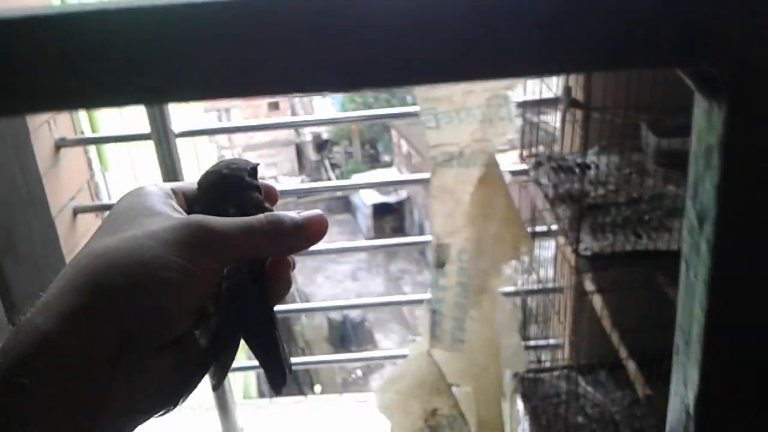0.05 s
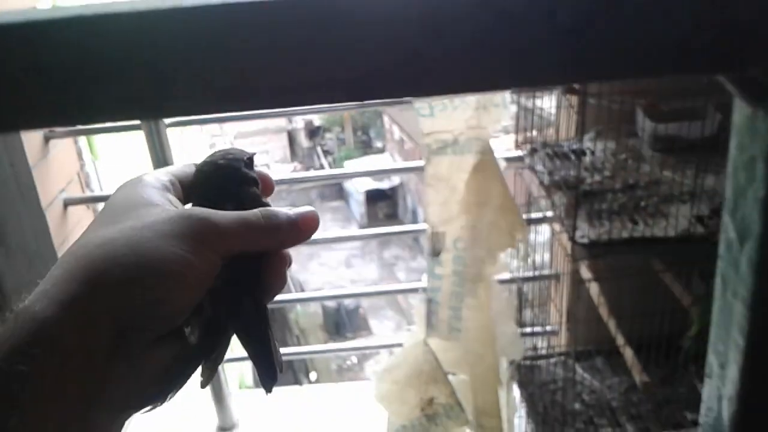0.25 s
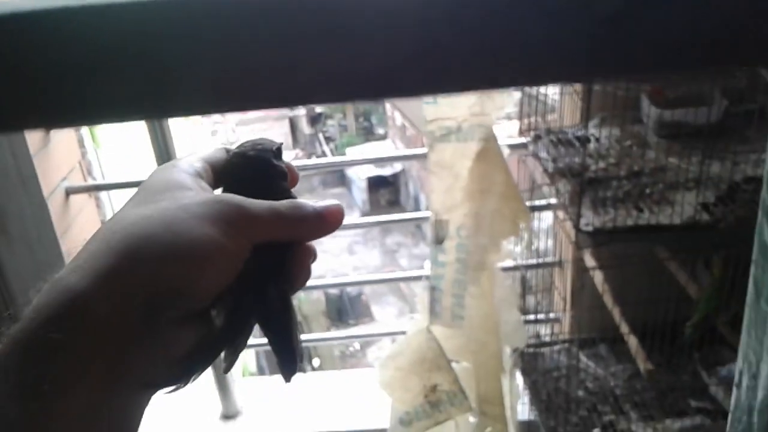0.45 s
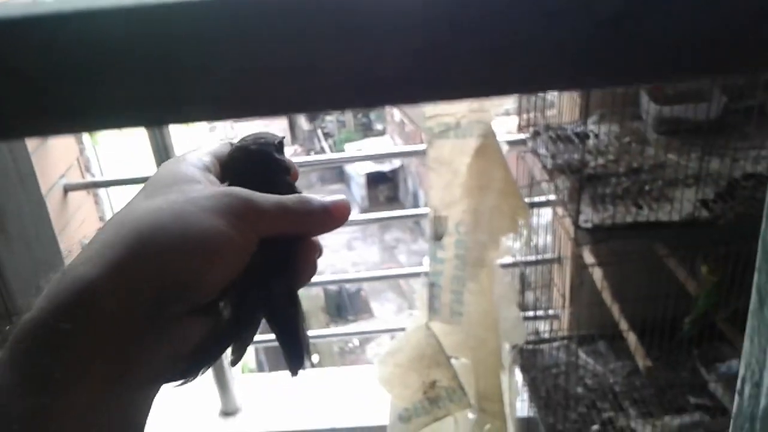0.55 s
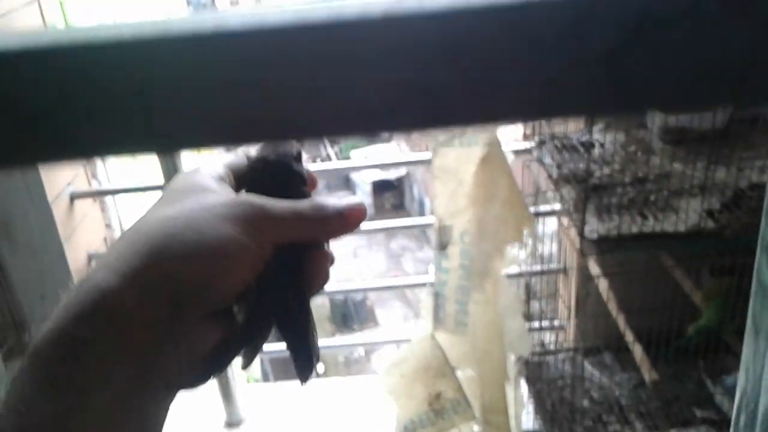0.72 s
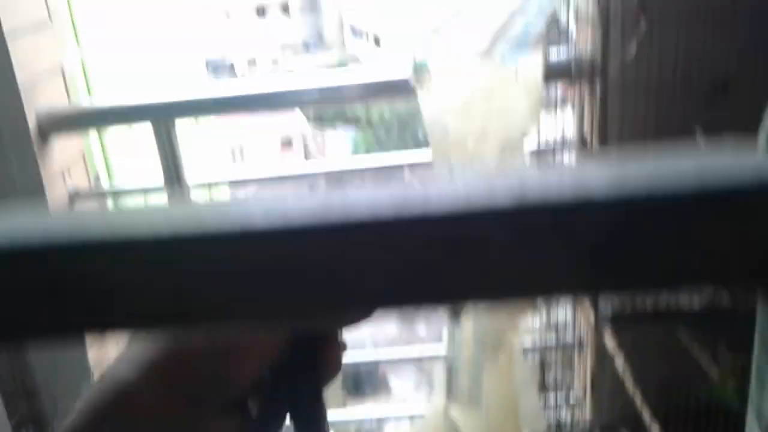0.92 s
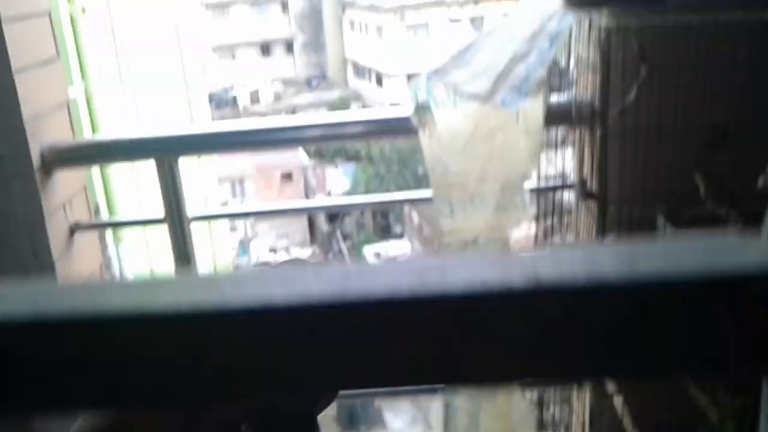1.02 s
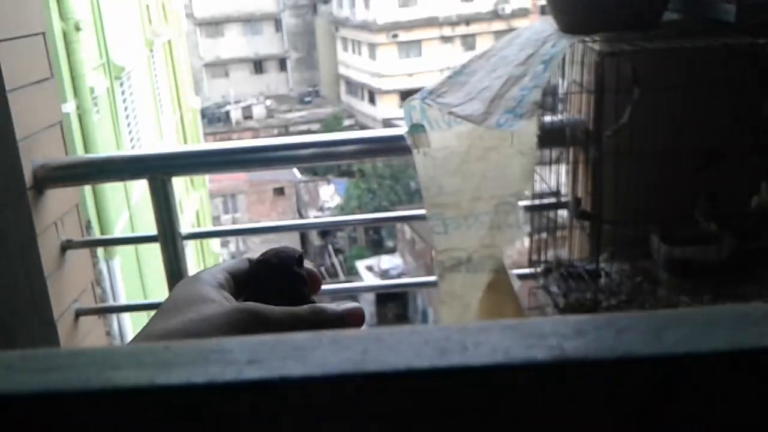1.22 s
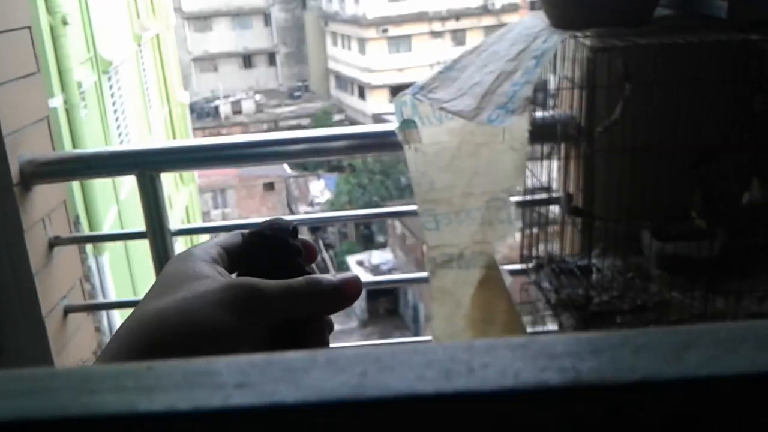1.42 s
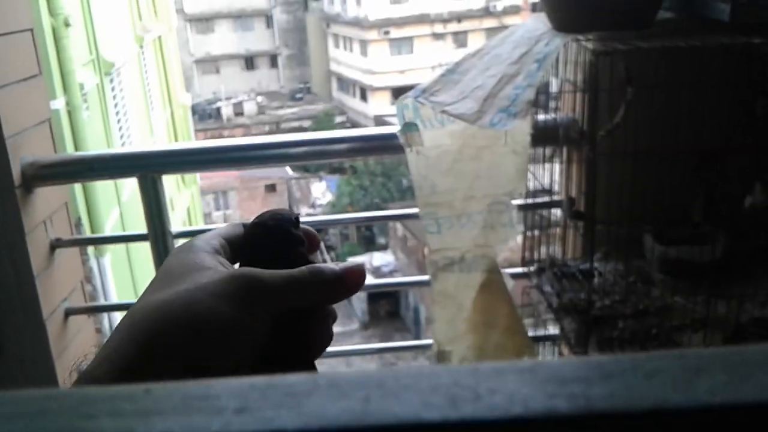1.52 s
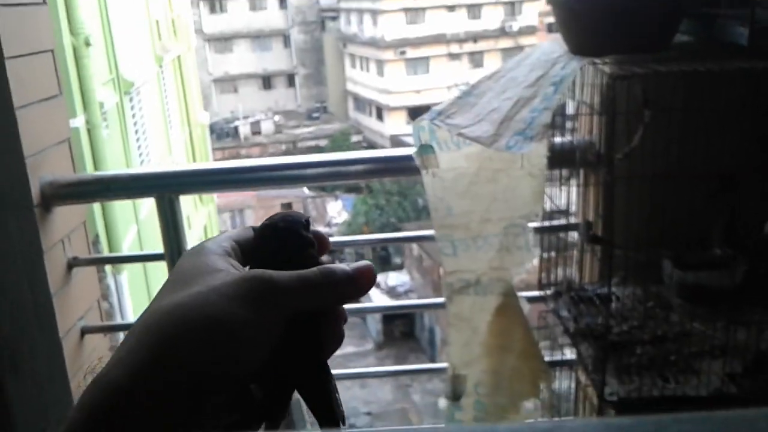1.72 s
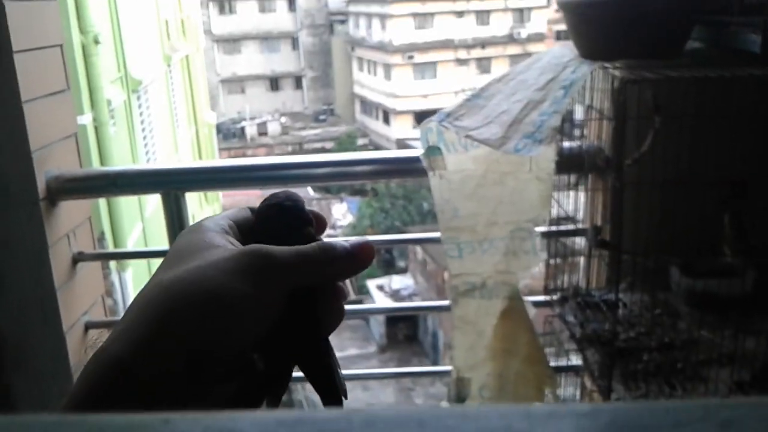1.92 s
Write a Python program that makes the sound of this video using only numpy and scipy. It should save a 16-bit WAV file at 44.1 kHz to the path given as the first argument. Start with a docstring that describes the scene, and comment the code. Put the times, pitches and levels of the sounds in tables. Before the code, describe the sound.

A bird held in the hand gives one harsh, trilling screech right at the microphone on a balcony. Afterwards small birds chirp and whistle faintly farther off, with a few soft handling rustles over a quiet town hum.

```python
"""One harsh screech, right at the microphone, from a swift held in the hand on a balcony: the two sides
of its voice box sound at once, rough and beating, then settle on one clean note. Farther off, small
birds give nasal chirps and thin whistles, and the walls echo every call. A few faint handling rustles
come through dry, and the hum of the town lies behind it all."""
import sys
import numpy as np
from scipy import signal
from scipy.fft import rfft, irfft
from scipy.io import wavfile

SR = 44100
rng = np.random.default_rng(int(sys.argv[2]) if len(sys.argv) > 2 else 0)


def wav_record(signal):
    """Record a signal, one row per channel, as 16-bit PCM in the file named by sys.argv[1]."""
    frames = np.transpose(np.atleast_2d(signal))
    bounded = np.clip(frames, -1, 1)
    # unit amplitude maps onto the largest positive 16-bit level
    quanta = np.round(bounded * 32767).astype(np.int16)
    wavfile.write(sys.argv[1], SR, quanta)


N = 85995

# lower side of the swift's voice box, before the beak (time [s], pitch [Hz], level [dB], roughness)
LOWER_VOICE = [(.177, 4990, -43, 0.16), (.181, 4130, -43.5, 0.36), (.2, 3620, -40, 0.41),
               (.212, 3266, -31, 0.08), (.219, 2750, -35, 0.64), (.246, 2750, -46.5, 0.64),
               (.255, 3118, -25, 0.11), (.268, 3550, -26, 0.26), (.284, 3400, -41, 0.62),
               (.293, 2691, -24, 0), (.31, 3173, -34, 0.62), (.316, 3130, -18.5, 0.12),
               (.347, 3296, -22.5, 0.04), (.35, 3252, -44, 0.43), (.364, 2735, -30.5, 0.88),
               (.378, 3200, -35.5, 0.74), (.405, 3358, -27, 0.27), (.428, 3350, -30.5, 0.77),
               (.437, 2896, -22, 0.11), (.448, 3120, -28, 0.43), (.475, 3061, -22.5, 0.02),
               (.494, 3020, -30.5, 0.49), (.509, 3116, -35.5, 0.1)]
# upper side, before the beak (time [s], pitch [Hz], level [dB], roughness)
UPPER_VOICE = [(.2125, 4300, -30.5, .6), (.216, 5200, -23.5, 0.54), (.224, 5100, -37.5, 0.98),
               (.236, 4520, -27.5, 0.28), (.256, 4300, -37.5, 0.66), (.269, 4300, -31, 0.44),
               (.284, 3800, -29, 0.65), (.309, 3500, -31, 0.38), (.331, 3838, -37, .12),
               (.352, 3400, -36, 0.47), (.358, 3450, -26.5, 0.4), (.368, 3350, -33, 0.43),
               (.3705, 3900, -58, 0.36), (.374, 4500, -31, 0.3), (.395, 4350, -39.5, 0.57),
               (.422, 3900, -30, 0.4), (.446, 3500, -33, 0.65), (.465, 3500, -35, 0.77),
               (.475, 4400, -35.5, 1.4), (.497, 4100, -55, 0.9)]
# overtones of both voices, each relative to its own fundamental (time [s], second [dB], third [dB])
OVERTONES = [(.175, -40, -34), (.187, 2.5, -7), (.205, -0.5, -17), (.22, -29, -26), (.25, -18.5, -30),
             (.328, -33.5, -38), (.353, -30, -20.5), (.403, -23.5, -14), (.464, -45, -26.5),
             (.474, -20.5, -22), (.51, -13, -20)]
# depth of the screech's fast trill (time [s], swing [share of pitch])
TRILL_DEPTH = [(.24, 0.032), (.268, 0.093), (.295, 0.032), (.322, .008), (.378, 0.012), (.39, 0.074),
               (.425, 0.066), (.438, 0.018), (.472, 0.0089)]
# filtering by the swift's beak (frequency [Hz], gain [dB])
BEAK_RESPONSE = [(1500, -48), (2350, -3.5), (2620, 3.5), (2850, -6), (3300, -1.5), (4500, 0), (5250, -3),
                 (5650, 0.5), (6300, 2.5), (8000, -6), (9800, -9), (11500, -14.5), (13000, -25),
                 (15000, -38)]
# air rasping through the screech (frequency [Hz], relative level [dB])
RASP_SPECTRUM = [(1000, -20), (2700, 1), (4800, 19), (6000, 3), (7500, 10.5), (10000, -30), (15500, -27)]
# small birds' nasal chirps (start [s], length [s], top pitch [Hz], rise [share of pitch],
# droop [share of pitch], level [dB], brightness [dB/octave], beak resonance [Hz])
CHIRP_NOTES = [(0.014, 0.092, 607.6, 0.076, 0.268, -47, 3.5, 3320),
               (0.759, 0.089, 600, .13, 0.11, -50.5, 3.5, 3000),
               (1.34, .094, 479.2, 0.0045, 0.11, -55, 3.5, 3200)]
# filtering by a small bird's throat (frequency [Hz], gain [dB])
THROAT_RESPONSE = [(1200, -14.5), (1800, -6.5), (1950, -9), (2400, -9.5), (3000, -4), (4250, -9.5),
                   (5500, -18.5), (6000, -22), (6600, -38)]
# small birds' thin whistles
# (start [s], length [s], first pitch [Hz], middle pitch [Hz], last pitch [Hz], level [dB], roughness)
WHISTLE_NOTES = [(0.733, 0.023, 5050, 4820, 4630, -57, 0.55), (0.752, 0.036, 4480, 4470, 4680, -50, 0.55),
                 (0.784, 0.11, 4200, 4206, 4320, -57, 1.9), (1.205, 0.047, 6620, 5500, 4770, -66, 1.3),
                 (1.369, 0.12, 5100, 4660, 5220, -60.5, 0.12), (1.47, 0.072, 5250, 5240, 5150, -66, 0.213),
                 (1.487, .1, 4800, 4680, 4680, -67.5, .15), (1.874, .1, 3060, 3030, 3130, -62, .5)]
# one long whistle (time [s], pitch [Hz], level [dB])
LONG_NOTE = [(1.679, 3260, -79), (1.694, 3740, -62), (1.715, 3884, -58.5), (1.845, 3853, -60),
             (1.886, 4090, -53.5), (1.915, 4250, -70)]
# handling rustles (peak time [s], attack [s], decay [s], level [dB], centre [Hz], width [octaves])
SCUFFS = [(0.649, 0.0021, 0.014, -62, 10060, 0.45), (.855, 0.085, .02, -64, 5800, 0.42),
          (0.952, 0.0026, 0.061, -55, 2600, 0.84), (1.336, 0.0023, 0.015, -54, 3220, 0.41),
          (1.885, 0.045, 0.15, -55.5, 3320, 0.55)]
# the town in the distance (frequency [Hz], relative level [dB])
TOWN_SPECTRUM = [(28, -51), (45, -7), (160, -4), (300, -1), (420, -7), (750, -11.5), (1400, -15.5),
                 (2100, -17), (3000, -10), (5200, -18.5), (8000, -27), (15500, -33)]
# steady tones in the town's hum (pitch [Hz], level [dB])
HUM_LINES = [(102.3, -79.5), (253.0, -72), (333.8, -68.5), (506.0, -72.5), (985.1, -75.5)]
# a low rush that comes and goes (frequency [Hz], relative level [dB])
RUSH_SPECTRUM = [(40, -19), (90, 6.5), (200, -2), (450, 1), (700, -10), (1050, -3.5), (1500, -9),
                 (2500, -6), (5000, -21.5)]
# swells of that rush (peak time [s], half width [s], level [dB])
RUSH_SWELLS = [(0.068, 0.062, -57.5), (0.39, 0.19, -52), (.82, 0.16, -60), (1.92, 0.063, -59)]
# resonances of the balcony (frequency [Hz], relative level [dB])
BALCONY_MODES = [(2635, 4.5), (3250, -28), (3455, -1), (4132, 0), (4312, 3), (4475, 4.5)]

TRILL_HZ, TRILL_SCATTER, THROB_DEPTH = 250, .24, .32
UPPER_BRIGHT_DB, FOURTH_HARMONIC_DB = 2, -4  # upper voice's overtone lift; fourth relative to third
JITTER, JITTER_HZ, SHIMMER, SHIMMER_HZ = .045, 380, .95, 300  # pitch and level shake at roughness 1
VOICE_RAMP_S, WHISTLE_RAMP_S = .002, .005
CHIRP_JITTER, CHIRP_BEAK_DB, CHIRP_BEAK_WIDTH_HZ = .0123, 6.5, 280
FLUTTER_DB, FLUTTER_HZ = 2.5, 45
TOWN_DB, TOWN_SWELL_DB, HUM_WAVER = -57, 1.5, .0044
WALL_DELAY_S, SLAP_DELAY_S, SLAP_DB = .003, .045, -16
EARLY_T60_S, RING_T60_S, TAIL_T60_S = .09, .15, .45
TOP_HZ = 15650


def swift_screech():
    """In the hand: both sides of the voice box trill and beat through the beak, with a rasp of air."""
    trill_phase = phase_of(TRILL_HZ * (1 + TRILL_SCATTER * wobble(TRILL_HZ / 2)))
    trill = 1 + curves(TRILL_DEPTH)[0] * np.sin(trill_phase)
    throb = 1 + THROB_DEPTH * np.cos(trill_phase / 2)  # every second trill cycle is the stronger
    second_gain, third_gain = undb(curves(OVERTONES))
    tone, power = 0, 0
    for voice, bright_db in ((LOWER_VOICE, 0), (UPPER_VOICE, UPPER_BRIGHT_DB)):
        hz, db, roughness = curves(voice)
        phase, swing = membrane(hz * trill, roughness)
        start, end = voice[0][0] - VOICE_RAMP_S, voice[-1][0] + VOICE_RAMP_S
        amplitude = undb(db) * swing * throb * gate(start, end, VOICE_RAMP_S, VOICE_RAMP_S)
        third_and_fourth = np.cos(3 * phase) + undb(FOURTH_HARMONIC_DB) * np.cos(4 * phase)
        overtones = second_gain * np.cos(2 * phase) + third_gain * third_and_fourth
        tone += amplitude * (np.cos(phase) + undb(bright_db) * overtones)
        power += amplitude ** 2
    rasp = undb(-27) * np.sqrt(power) * noise(RASP_SPECTRUM)  # follows the strength of both voices
    return colour(tone, BEAK_RESPONSE) + rasp


def membrane(hz, roughness):
    """Phase and swing of one side of a voice box; roughness shakes both."""
    phase = phase_of(hz * (1 + JITTER * roughness * wobble(JITTER_HZ)))
    shake = SHIMMER * roughness
    return phase, np.sqrt(2) * (1 + shake * wobble(SHIMMER_HZ)) / np.sqrt(1 + shake ** 2)


def nasal_chirps():
    """Farther off: buzzy notes arch in pitch behind a fixed throat; the beak lifts one band per note."""
    out, harmonics = np.zeros(N), np.arange(1, 15)
    for start, length, top_hz, rise, droop, db, brightness, beak_hz in CHIRP_NOTES:
        along = note_position(start, length)
        arch = 1 - np.where(along < 0, rise, droop) * np.abs(along) ** 3
        hz = top_hz * arch * (1 + CHIRP_JITTER * wobble(hz=355))
        phase = phase_of(hz)
        gains = gain_at(harmonics * top_hz, THROAT_RESPONSE) * undb(brightness * np.log2(harmonics))
        note = 0
        for k, gain in zip(harmonics, gains):
            detuning = (k * hz - beak_hz) / CHIRP_BEAK_WIDTH_HZ
            beak = 1 + (undb(CHIRP_BEAK_DB) - 1) / (1 + detuning ** 2)
            note += gain * beak * np.sin(k * phase)
        out += undb(db) * unit(note) * gate(start, start + length, attack_s=.031, release_s=.014)
    return out


def thin_whistles():
    """Farther off: one membrane per note gives short glides, some hoarse, and a long fluttering tone."""
    glides = np.zeros(N)
    for start, length, first, middle, last, db, roughness in WHISTLE_NOTES:
        along = note_position(start, length)
        slope, bend = (last - first) / 2, (first + last) / 2 - middle
        phase, swing = membrane(middle + slope * along + bend * along ** 2, roughness)
        envelope = gate(start, start + length, WHISTLE_RAMP_S, WHISTLE_RAMP_S)
        glides += undb(db) * swing * np.sin(phase) * envelope
    hz, db = curves(LONG_NOTE)
    phase, swing = membrane(hz, roughness=.033)
    flutter = undb(FLUTTER_DB * wobble(FLUTTER_HZ))
    envelope = gate(LONG_NOTE[0][0], LONG_NOTE[-1][0], VOICE_RAMP_S, WHISTLE_RAMP_S)
    return glides + undb(db) * swing * flutter * np.sin(phase) * envelope


def handling_rustles():
    """Soft scuffs of handling, each a broad band of noise that rises and dies away."""
    out, octave = np.zeros(N), np.log2(np.fft.rfftfreq(N, 1 / SR) + 1)
    for peak_s, attack, decay, db, hz, width in SCUFFS:
        bell = np.exp(-.5 * ((octave - np.log2(hz)) / width) ** 2)
        band = irfft(rfft(rng.standard_normal(N)) * bell, N)
        age = clock() - peak_s
        out += undb(db) * unit(band) * np.exp(-np.maximum(age / decay, -age / attack))
    return out


def distant_town():
    """Beyond the balcony: a wash of noise, wavering hum tones and a few swells of low rush."""
    hum = 0
    for hz, db in HUM_LINES:
        phase = phase_of(hz * (1 + HUM_WAVER * wobble(hz=16.4)))
        hum += undb(db) * np.sqrt(2) * np.sin(phase)
    swells = sum(undb(db) * np.exp(-((clock() - at) / width) ** 2) for at, width, db in RUSH_SWELLS)
    rush = swells * noise(RUSH_SPECTRUM)
    wash = undb(TOWN_DB + TOWN_SWELL_DB * wobble(hz=6.6)) * noise(TOWN_SPECTRUM)
    return wash + hum + rush


def balcony(call, early_db, tail_db):
    """At the microphone: the direct call, near walls, ringing, a facing wall's slap and a soft tail."""
    t = clock()
    fade = lambda t60: np.exp(-np.log(1000) * t / t60) * (t > WALL_DELAY_S)
    ring = fade(RING_T60_S)
    modes = sum(undb(db) * np.cos(2 * np.pi * hz * t) for hz, db in BALCONY_MODES)
    response = 2 * ring / ring.sum() * modes
    for t60, db in ((EARLY_T60_S, early_db), (TAIL_T60_S, tail_db)):
        response += undb(db) * unit(rng.standard_normal(N) * fade(t60)) / np.sqrt(N)
    slap = undb(SLAP_DB) * np.interp(t - SLAP_DELAY_S, t, call, left=0)
    return call + slap + signal.fftconvolve(call, response)[:N]


def undb(db):
    """Decibels to gain."""
    return 10 ** (np.asarray(db) / 20)


def unit(x):
    """Scale to rms 1."""
    return x / np.sqrt(np.mean(x ** 2) + 1e-18)


def clock():
    """Time of every sample in seconds."""
    return np.arange(N) / SR


def phase_of(hz):
    """Running phase of a moving pitch, in radians."""
    return 2 * np.pi * np.cumsum(hz) / SR


def note_position(start, length):
    """Runs from -1 at a note's start to 1 at its end."""
    return np.clip(2 * (clock() - start) / length - 1, -1, 1)


def gain_at(hz, points):
    """Gain of a (frequency [Hz], level [dB]) curve on a log-frequency axis."""
    f, db = np.array(points).T
    return undb(np.interp(np.log(hz + 1), np.log(f), db))


def colour(x, points):
    """Filter by a (frequency [Hz], level [dB]) curve."""
    return irfft(rfft(x) * gain_at(np.fft.rfftfreq(N, 1 / SR), points), N)


def noise(points):
    """Coloured noise of rms 1."""
    return unit(colour(rng.standard_normal(N), points))


def wobble(hz):
    """Random motion of rms 1, up to about the given rate."""
    return unit(irfft(rfft(rng.standard_normal(N)) / (1 + (np.fft.rfftfreq(N, 1 / SR) / hz) ** 4), N))


def curves(table):
    """A table's columns, joined by straight lines in time."""
    times, *columns = np.array(table).T
    return [np.interp(clock(), np.sort(times), column) for column in columns]


def gate(start, end, attack_s, release_s):
    """Smooth attack, hold and release."""
    t = clock()
    ramp = np.clip(np.minimum((t - start) / attack_s, (end - t) / release_s), 0, 1)
    return np.sin(np.pi / 2 * ramp) ** 2


def scene():
    """One microphone on the balcony: the swift close by, small birds farther off, the town behind."""
    swift = balcony(swift_screech(), early_db=-5.5, tail_db=-18)
    small_birds = balcony(nasal_chirps() + thin_whistles(), early_db=-10, tail_db=-12)
    return (swift + small_birds + handling_rustles() + distant_town())[None]


def record(dry):
    """The recorder cuts the top treble steeply."""
    return signal.sosfilt(signal.ellip(10, .2, 70, TOP_HZ, fs=SR, output="sos"), dry)


dry = scene()
out = record(dry)
wav_record(out)
```